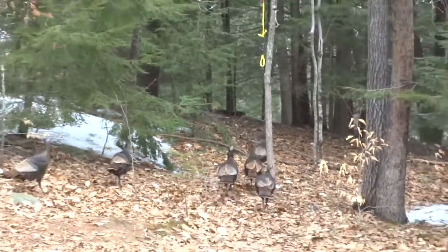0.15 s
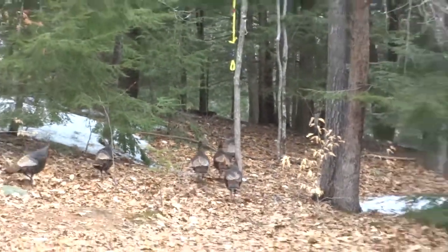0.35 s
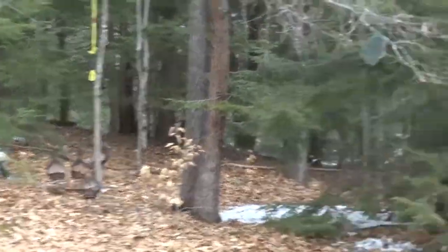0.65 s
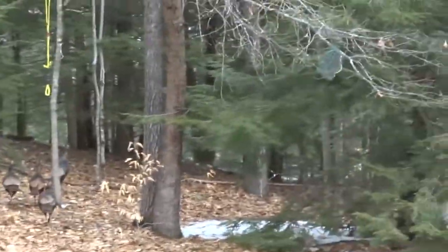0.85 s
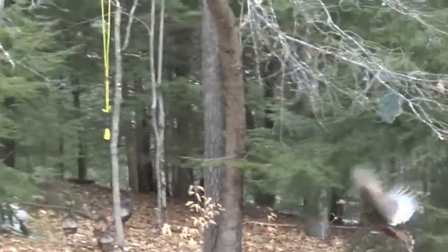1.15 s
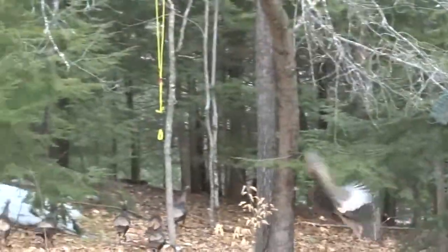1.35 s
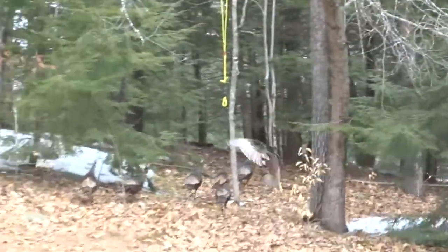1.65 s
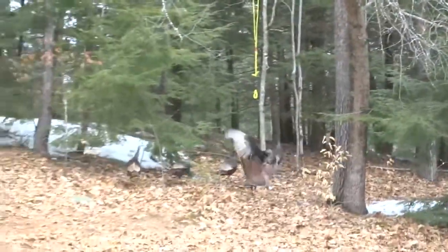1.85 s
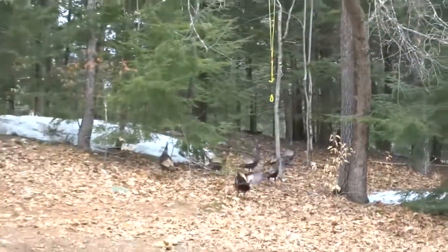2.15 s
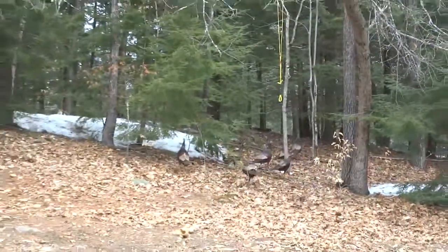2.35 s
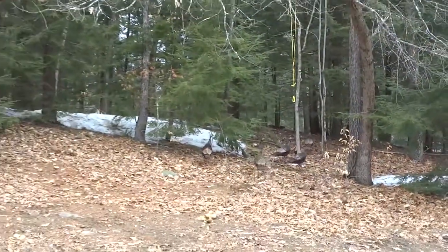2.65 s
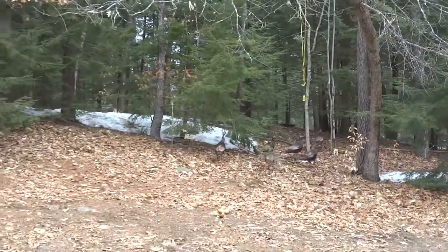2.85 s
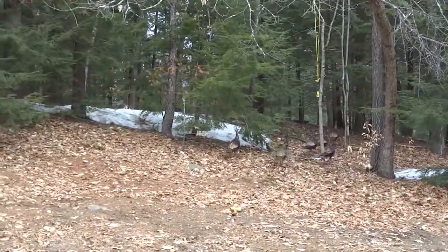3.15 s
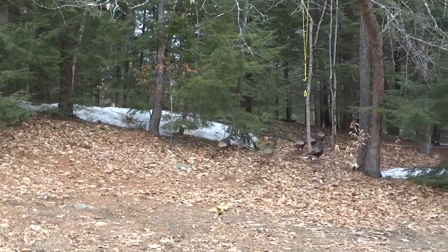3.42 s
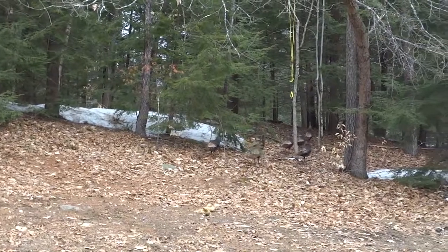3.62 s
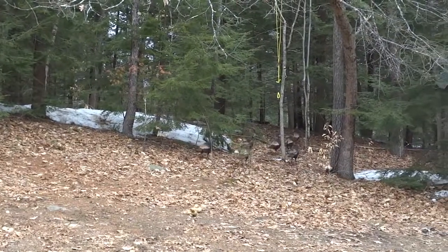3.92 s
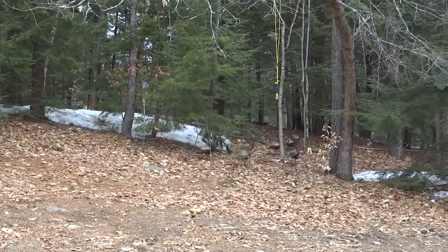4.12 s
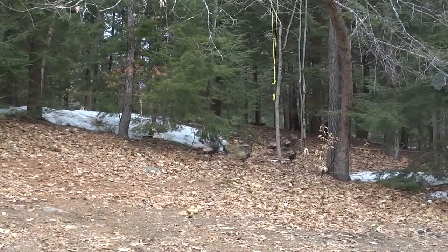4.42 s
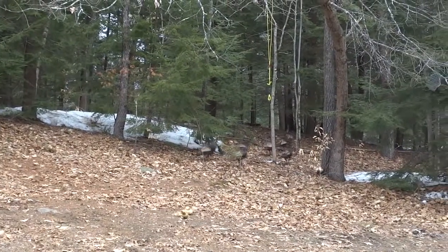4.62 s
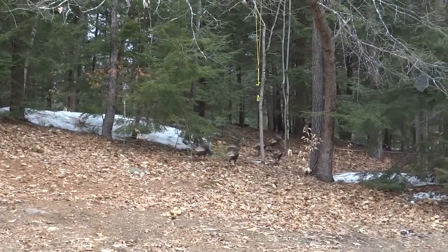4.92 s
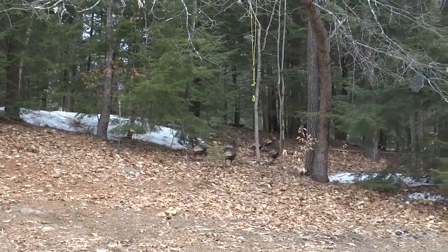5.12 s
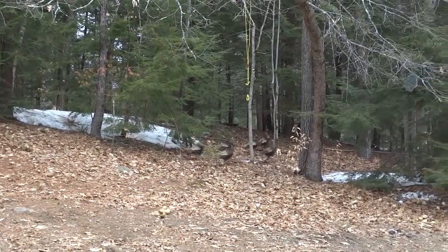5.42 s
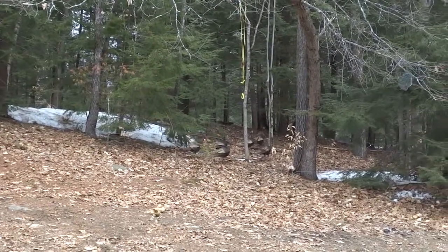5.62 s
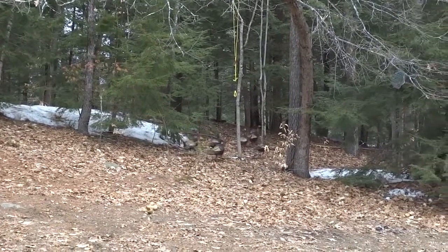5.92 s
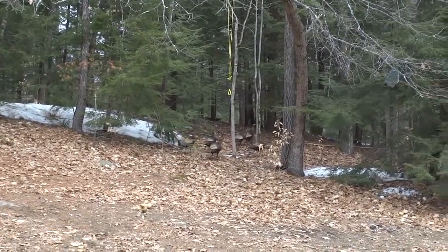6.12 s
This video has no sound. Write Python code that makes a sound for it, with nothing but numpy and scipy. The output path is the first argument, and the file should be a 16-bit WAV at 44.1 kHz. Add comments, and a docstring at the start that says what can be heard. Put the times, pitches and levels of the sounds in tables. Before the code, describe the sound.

In a leafy wood, a distant turkey gobbles weakly, then a much louder one answers close to the microphone with tumbling rasps, hoots and squeaks. Trees return dense echoes. Dry leaves rustle and twigs snap as a bird lands, then settle into small flurries. Two thin high songbird peeps follow over a soft, fading rush of treetop air.

```python
"""Wild turkeys at the edge of a wood: a far gobble sets off a loud one close to the microphone.
Each gobble mixes buzzing rasps, from pulses ringing in throat and windpipe, with short, nearly pure hoots.
Trunks scatter both as dense echoes. A bird comes down into dry leaves: filtered noise rustles and settles,
noise bursts snap and thud. Small songbirds give thin high peeps, over a soft rush from the treetops."""
import sys
import numpy as np
from scipy import signal
from scipy.fft import rfft, irfft, next_fast_len
from scipy.io import wavfile

SR = 44100
rng = np.random.default_rng(int(sys.argv[2]) if len(sys.argv) > 2 else 0)


def unload_audio(sound):
    """Save the sound as a 16-bit wav file, at the path given as the first command line argument."""
    columns = np.transpose(np.atleast_2d(sound))
    # keep every value between -1 and 1, then stretch to whole-number steps
    steps = np.round(np.clip(columns, -1, 1) * 32767)
    wavfile.write(sys.argv[1], SR, steps.astype(np.int16))


N = 276507
TIME = np.arange(N) / SR  # s


def undb(db):
    """Decibels to gain."""
    return 10 ** (np.asarray(db) / 20)


def unit(x):
    """Scale to rms 1."""
    return x / np.sqrt(np.mean(x ** 2) + 1e-20)


def curve(rows):
    """Join (s, value) rows by straight lines."""
    return np.interp(TIME, *np.transpose(rows))


def add(track, start, sound):
    """Mix a sound into a track from a given time in seconds."""
    i = int(start * SR)
    track[i:i + len(sound)] += sound[:N - i]


def colour(x, points):
    """Filter by a (Hz, dB) spectrum, joined by straight lines over log frequency."""
    hz, db = np.transpose(points)
    size = next_fast_len(x.shape[-1])
    f = np.fft.rfftfreq(size, 1 / SR) + 1  # the 1 keeps the logarithm finite
    gain = undb(np.interp(np.log(f), np.log(hz), db))
    return irfft(rfft(x, size) * gain, size)[..., :x.shape[-1]]


def resonate(x, hz, width_hz):
    """One resonance, gain 1 at its centre."""
    return signal.lfilter(*signal.iirpeak(hz, hz / width_hz, fs=SR), x)


def walk(rate, size=N):
    """Random wandering through `rate` normal draws a second, joined by straight lines."""
    at = np.arange(size) * rate / SR
    steps = np.random.default_rng(rng.integers(2 ** 31)).standard_normal(int(at[-1]) + 2)
    return np.interp(at, np.arange(len(steps)), steps)


def swell(length, edge, lean=1):
    """Progress 0-1 through a note and its rounded envelope; lean under 1 makes the attack quicker than the fall."""
    u = np.linspace(0, 1, int(length * SR))
    return u, np.abs(np.sin(np.pi * u ** lean)) ** edge


def spread(mid, side, side_db):
    """Left and right from a shared and an opposed part."""
    return mid + undb(side_db) * side * np.array([[1], [-1]])


def near_gobble():
    """Rasps, hoots and three-toned squeaks of the close bird tumble over each other."""
    # Pure notes, high whistles among them at first, then mostly low hoots.
    # Each row: centre in seconds, length in seconds, pitch in Hz, level in dB before the mix.
    hoot_notes = [(1.176, .026, 2942, -21), (1.186, 0.033, 1771, -21.5), (1.236, 0.029, 1746, -16.5),
                  (1.264, .034, 1486, -15.5), (1.366, .012, 1036, -13.5), (1.40, 0.04, 1788, -15),
                  (1.448, 0.031, 1307, -11), (1.461, .027, 2761, -13.5), (1.470, .039, 1075, -15.5),
                  (1.530, .016, 1015, -8.5), (1.573, 0.028, 1050, -8.5), (1.607, .022, 1089, -7),
                  (1.642, 0.044, 1938, -21), (1.655, 0.038, 1051, -12.5), (1.719, .015, 998, -13),
                  (1.755, 0.023, 1057, -13), (1.796, .033, 991, -16), (1.818, 0.027, 909, -15),
                  (1.906, 0.038, 930, -14.5), (1.980, 0.015, 976, -14.5), (2.073, .011, 992, -19.5),
                  (2.090, 0.017, 929, -12.5), (2.156, .022, 883, -17.5), (2.226, 0.027, 989, -25)]
    # Buzzing notes. Each row: centre in seconds, length in seconds, pitch in Hz at mid note,
    # level in dB before the mix, treble tilt in dB reached at 5 kHz.
    rasp_notes = [(1.181, .048, 598, -16.5, -7), (1.211, .04, 541, -21.5, -3), (1.238, .044, 432, -17, 2),
                  (1.266, .042, 256.6, -20, -3), (1.335, .05, 577, -28.5, -1.5),
                  (1.392, .056, 593, -14.5, -4), (1.446, .05, 660.2, -14, -1.5),
                  (1.468, .044, 673.5, -16, 2), (1.505, .05, 665.7, -29.5, 0),
                  (1.574, .05, 586.6, -20, -1.5), (1.640, .072, 649.5, -14, 2),
                  (1.714, .026, 607, -22, -6.5), (1.761, .036, 624, -24, 1), (1.816, .06, 694, -16.5, 2),
                  (1.913, .049, 708.7, -20.5, 1), (2.0, .04, 599, -22.5, 3.5), (2.081, .06, 557.5, -22, 1),
                  (2.163, .04, 641, -23.5, 3.5), (2.228, .026, 998, -27.5, 7)]
    # Thin squeaks between the hoots. Each row: centre in seconds, level in dB before the tone's own.
    squeak_times = [(1.310, -27.5), (1.376, -24), (1.517, -22.5), (1.602, -22.5), (1.751, -21),
                    (1.875, -28), (1.995, -32), (2.053, -31.5), (2.165, -38.5), (2.222, -33.5)]
    # Tones of a squeak; the upper ones gain as the gobble goes on.
    # Each row: pitch in Hz, level in dB in the first squeak, gain in dB per second.
    squeak_tones = [(3246, 2, -2), (3960, -11.5, 12), (5150, -20, 18)]
    squeak_s = .018
    first = squeak_times[0][0]
    squeaks = []
    for t, db in squeak_times:
        for hz, tone_db, gain in squeak_tones:
            squeaks.append((t, squeak_s, hz, db + tone_db + gain * (t - first)))
    return hoots(hoot_notes + squeaks) + rasps(rasp_notes)


def hoots(rows, waver=0.035, arch=0.063, fall=.05, second_db=-29, third_db=-23):
    """The syrinx whistles almost purely; the pitch arches with the push of each note and slips down."""
    out = np.zeros(N)
    for t, length, hz, db in rows:
        u, env = swell(length, edge=0.86, lean=0.85)
        pitch = hz * (1 + arch * (env - .8) - fall * (u - .5) + waver * walk(400, len(u)))
        phase = 2 * np.pi * np.cumsum(pitch) / SR
        second = undb(second_db) * np.sin(2 * phase)
        third = undb(third_db) * np.sin(np.pi + phase * 3)
        tone = np.sin(phase) + second + third
        add(out, t - length / 2, undb(db) * env * unit(tone))
    return out


def rasps(rows, jitter=0.12, shimmer_db=6, limp=0.33, throat_width_hz=170, ring_lift_db=6, ring_width_hz=130):
    """The membranes slap shut once a cycle; through a gobble the cycles grow uneven and more air hisses."""
    # Colour of the throat. Each row: frequency in Hz, level in dB.
    throat = [(180, -94.5), (300, -59.5), (595, -13.5), (789, -15.5), (1060, 1), (1430, -10), (1590, -4.5),
              (1760, -4.5), (2140, -8.5), (2710, -7.5), (3390, -10), (5970, -23), (7130, -25),
              (10500, -40.5), (13600, -69), (22000, -120)]
    # Fixed rings of the windpipe. Each row: centre in Hz, width in Hz, lift in dB.
    windpipe = [(400, 120, -4), (660, 130, 2), (1470, 200, -1), (2250, 200, -4), (3400, 200, 2),
                (3780, 220, -6), (4130, 200, 4), (4650, 300, -4), (5150, 170, 8), (5950, 500, -4),
                (7250, 400, 5), (8500, 1200, 5)]
    throat_hz = 3300
    rise = .07  # share by which the pitch climbs within a note
    out = np.zeros(N)
    span = rows[0][0], rows[-1][0]
    for t, length, pitch_hz, db, treble_db in rows:
        rough = np.interp(t, span, (.42, .76))  # 0-1, from first note to last
        lift_db = np.interp(t, span, (-0.5, 10.5))  # the throat tightens and rings more
        u, env = swell(length, edge=1.4, lean=0.82)
        pitch = pitch_hz * (1 + rise * (u - .5)) * (1 + jitter * rough * walk(500, len(u)))
        turns = np.cumsum(pitch) / SR
        slaps = np.sinc((turns % 1 - .5) * SR / pitch / 2)  # one narrow pulse a cycle
        slaps *= undb(shimmer_db * rough * np.tanh(walk(450, len(u))))
        slaps *= 1 + limp * np.sin(np.pi * turns)  # strong and weak slaps alternate
        breath = walk(SR, len(u)) * np.exp(-2 * ((turns - .5) % 1))  # hiss dying away after each slap
        voice = colour(unit(slaps - slaps.mean()) + .5 * rough * unit(breath), throat)
        voice = colour(voice, [(3300, 0.0019), (5000, treble_db)])
        # four narrow rings at random pitches colour each note differently
        chance = [(hz, ring_width_hz, ring_lift_db) for hz in rng.uniform(2000, 7500, size=4)]
        for hz, width_hz, ring_db in windpipe + chance + [(throat_hz, throat_width_hz, lift_db)]:
            voice = voice + (undb(ring_db) - 1) * resonate(voice, hz, width_hz)
        for hz in (1100, 1400, 1800, 2300, 2800, 3400, 4200, 5200):
            voice = voice - 2 * resonate(voice, hz, 300)  # all-pass: the long neck spreads each slap in time
        add(out, t - length / 2, undb(db) * env * unit(voice))
    return out


def far_gobble(count=11):
    """Hoots sag unevenly in pitch over an even rattle of rasps that grows weaker and duller."""
    # Hoots of the far bird. Each row: centre in seconds, level in dB before the mix.
    far_notes = [(0.368, -34.5), (.418, -30), (.475, -37.5), (0.529, -36.5), (.59, -29.5), (.645, -36.5),
                 (.716, -31), (0.796, -34.5), (0.857, -32.5), (.888, -30.5), (1.017, -34)]
    begin_s, hoot_s = .352, 0.017
    start_hz, end_hz, sag_s = 1420, 1045, .2  # the pitch sags, quickly at first
    scatter = .022  # typical share by which single hoots miss that pitch
    rasps_per_s, rasp_s, rasp_hz = 13.5, .07, 593.4
    rasp_db, fade_db_per_s = -35, 13  # level before the mix
    treble_db, dulling_db_per_s = -1.5, 8
    notes = []
    for t, db in far_notes:
        sagging_hz = end_hz + (start_hz - end_hz) * np.exp((begin_s - t) / sag_s)
        notes.append((t, hoot_s, sagging_hz * (1 + scatter * rng.standard_normal()), db))
    rattle = []
    for age in np.arange(count) / rasps_per_s:
        level_db = rasp_db - fade_db_per_s * age
        rattle.append((begin_s + age, rasp_s, rasp_hz, level_db, treble_db - dulling_db_per_s * age))
    return hoots(notes) + rasps(rattle) + far_whistles(begin_s)


def far_whistles(begin_s, count=12, span_s=.36, length_s=.028, level_db=-44.5):
    """Short, thin whistles at even steps through the first half of the far gobble, each at its own pitch."""
    times = begin_s + np.linspace(0, span_s, count)
    pitches = rng.uniform(2500, 5000, size=count)  # Hz
    return hoots([(t, length_s, hz, level_db) for t, hz in zip(times, pitches)])


def woods(x, t60, first_s, near_db, near_t60, side_db, grain=0.67):
    """Nearby trunks throw back a quick cluster of echoes; the deep wood adds a long tail."""
    age = TIME[:2 * SR]
    echoes = rng.standard_normal((2, len(age)))
    echoes = echoes * np.exp(grain * rng.standard_normal(len(age)))  # grain: unevenness of the echoes
    deep = colour(echoes, [(300, 1.0), (650, 7.0), (900, -5.5), (1150, 0), (1500, 2.5),
                           (3500, -1.5), (5200, 3.5), (10000, -5.5)])
    deep = deep * undb(-60 * age / t60)
    trunks = echoes * undb(near_db - 60 * age / near_t60)
    response = (deep + trunks) * np.clip(age / first_s - .5, 0, 1)  # a short gap, then a ramp
    response /= np.sqrt(np.sum(response[0] ** 2))
    mid, side = signal.fftconvolve(x[None], response, axes=1)[:, :N]
    return spread(mid, colour(side, [(4500, 0), (7500, 5)]), side_db)  # the treble scatters wider


def leaves(crackle_db=3, flutter_db=1.0):
    """Countless tiny crackles in the dry litter: noise of fast-changing level, spread over both sides."""
    # Colour of the rustle. Each row: frequency in Hz, level in dB.
    rustle_colour = [(1500, -32.5), (3000, -9), (5000, -11), (6200, -2.5), (7300, 0), (8600, -2.5),
                     (9500, -9.5), (11000, -14)]
    grains = rng.standard_normal((2, N)) * undb(crackle_db * walk(900) + flutter_db * walk(35))
    return spread(*unit(colour(grains, rustle_colour)), side_db=-12.0) * stirring()


def stirring():
    """The litter is stirred up as the bird comes down, then settles to rest, with a few later flurries."""
    # Later flurries in the leaves. Each row: centre in seconds, length in seconds, peak level in dB.
    flurries = [(3.519, 0.18, -53.5), (3.88, 0.3, -54.5), (4.373, 0.27, -59), (4.717, .1, -59.5),
                (4.94, 0.19, -62.5), (5.249, 0.43, -64.5), (5.6, 0.098, -69), (5.88, .2, -71)]
    stir_s, settle_s = 1.12, 2.427  # the rustle is at its fullest between these times
    full_db, rest_db = -42, -71
    stir_db_per_s, settle_db_per_s = 8.5, 10.5
    db = full_db - stir_db_per_s * np.maximum(stir_s - TIME, 0)
    db = db - settle_db_per_s * np.maximum(TIME - settle_s, 0)
    power = undb(db) ** 2 + undb(rest_db) ** 2
    for t, length, flurry_db in flurries:
        _, env = swell(length, edge=0.6)
        add(power, t - length / 2, (undb(flurry_db) * env) ** 2)
    return np.sqrt(power)


def snaps():
    """Dry twigs and leaves crack: short bursts of resonant noise, dying away."""
    # Each row: start in seconds, level in dB before the colouring, centre in Hz, time to fall 60 dB in seconds.
    cracks = [(0.176, -33, 2060, 0.023), (1.047, -33, 2610, 0.059), (1.141, -26.5, 1680, 0.03),
              (1.343, -29, 8100, 0.032), (2.386, -26.5, 5900, 0.13), (2.521, -29, 2240, 0.046),
              (2.569, -21, 2210, 0.015), (3.465, -39, 8000, 0.043), (3.532, -41, 8500, 0.041),
              (4.430, -38.5, 8600, 0.032), (4.937, -45.5, 5600, 0.34), (4.94, -54.5, 2700, 0.27)]
    out = np.zeros(N)
    age = TIME[:SR // 4]
    for t, db, hz, t60 in cracks:
        crack = unit(resonate(rng.standard_normal(len(age)), hz, hz * 0.33))
        attack = np.minimum(age / t60 * 20, 1)
        add(out, t, undb(db - 60 * age / t60) * attack * crack)
    return colour(out, [(100, -44.5), (400, -17), (900, 2.0), (11000, -8.5)])


def thuds():
    """Dull puffs of air pressure: swells of noise, twice through one broad resonance."""
    # Each row: centre in seconds, length in seconds, level in dB at the peak of the swell, centre in Hz.
    puffs = [(1.144, 0.027, -71, 109.5), (1.34, 0.037, -63, 76.1), (1.462, .07, -71, 118),
             (1.599, 0.062, -66, 110), (2.011, 0.033, -63, 183), (3.056, .018, -51, 540)]
    out = np.zeros(N)
    for t, length, db, hz in puffs:
        u, env = swell(length, edge=2)
        puff = resonate(resonate(walk(SR, len(u)), hz, hz * 1.5), hz, hz * 1.5)
        add(out, t - length / 2, undb(db) * env * unit(puff))
    return out


def peeps(scoop=.14, rise_s=0.016, drop=0.31, drop_s=0.0043):
    """Songbirds: thin whistles that scoop up to their pitch and flick down at the end."""
    # Each row: start in seconds, length in seconds, top pitch in Hz, level in dB before the echoes.
    bird_notes = [(1.048, .07, 7980, -45), (4.007, 0.083, 7760, -36.5), (4.179, 0.055, 7790, -36.5),
                  (5.61, 0.093, 7970, -66.5), (5.702, 0.072, 7500, -66.5), (5.812, 0.13, 7520, -48.5),
                  (6.061, 0.15, 3460, -80)]
    out = np.zeros(N)
    for t, length, hz, db in bird_notes:
        u, env = swell(length, edge=0.65)
        scooping = scoop * np.exp(-u * length / rise_s)
        dropping = drop * np.exp((u - 1) * length / drop_s)
        pitch = hz * (1 - scooping - dropping + 0.003 * walk(284, len(u)))
        add(out, t, undb(db) * env * unit(np.sin(2 * np.pi * np.cumsum(pitch) / SR)))
    return out


def air():
    """A soft rush from the treetops, nearly alike on both sides; its hollow colour gives way to a broader one."""
    # Level of the distant air in the trees. Each row: time in seconds, level in dB.
    air_level = [(0, -50), (.3, -49), (2.6, -47.5), (3.15, -56.5), (4.47, -60.5), (4.5, -65), (5.05, -67.5),
                 (5.7, -73.5), (6.27, -73.5)]
    # Hollower colour of the first seconds. Each row: frequency in Hz, level in dB.
    early_colour = [(40, -42), (250, -33), (420, -28.5), (540, -19.5), (680, -4), (850, -13), (1250, -3),
                    (1500, -8), (2200, -11.5), (3400, -13.5), (4700, -15), (6500, -28), (11000, -62.5)]
    # Colour that follows. Each row: frequency in Hz, level in dB.
    late_colour = [(18, -67), (30, -47.5), (102, -30.5), (141, -31), (213, -26.5), (376, -24.5),
                   (438, -12.5), (500, -16), (663, -5.5), (940, -1), (1050, 3.5), (1450, 0.5), (2110, -6.5),
                   (3630, -13), (5500, -10), (7150, -50), (12100, -120)]
    early = unit(colour(rng.standard_normal((2, N)), early_colour))
    late = unit(colour(rng.standard_normal((2, N)), late_colour))
    share = curve([(2.0, 0), (3.1, 1)])
    rush = np.sqrt(1 - share) * early + np.sqrt(share) * late
    return spread(*rush, side_db=-10) * undb(curve(air_level) + .6 * walk(20))


def hush():
    """Steady murmur of the far landscape: faint low noise, twice through one resonance."""
    hz, width_hz, level_db = 450, 240, -85
    sides = []
    for noise in rng.standard_normal((2, N)):
        sides.append(unit(resonate(resonate(noise, hz, width_hz), hz, width_hz)))
    return undb(level_db) * spread(*sides, side_db=-8)


def place(x, pan_db):
    """Make the left louder than the right by pan_db; negative leans right."""
    return x * undb(np.array([[pan_db], [-pan_db]]) / 2)


def scene():
    """Near and far turkeys, the songbirds and the wood around them."""
    near = near_gobble()
    far = far_gobble()
    song = peeps()
    near_echo = woods(near, t60=0.9, first_s=0.018, near_db=15.0, near_t60=0.096, side_db=-11)
    near = undb(-1.0) * near + undb(-9) * near_echo
    # the far voice is thinner below and strongest around 1 kHz
    far = colour(far, [(550, -10.0), (1000, 4.0), (2000, 0.0), (3000, -0.5), (5000, 1.5), (8000, 2.0)])
    far_echo = woods(far, t60=1.8, first_s=0.0043, near_db=5, near_t60=0.2, side_db=-14.5)
    far = undb(-4.0) * far + undb(-2.5) * far_echo
    song_echo = woods(song, t60=0.54, first_s=.012, near_db=12.5, near_t60=0.065, side_db=-19.5)
    song = song + undb(-0.5) * song_echo
    birds = place(near, pan_db=2.0) + place(far + song, pan_db=-0.66)
    return birds + snaps() + thuds() + air() + hush() + leaves()


def record(dry):
    """The recorder rounds the very highest peaks and cuts the top steeply."""
    top_hz = 10950
    held = dry / (1 + (dry / .9) ** 8) ** (1 / 8)  # never beyond 0.9
    return signal.sosfilt(signal.ellip(12, .2, 80, top_hz, fs=SR, output="sos"), held)


dry = scene()
out = record(dry)
unload_audio(out)
```